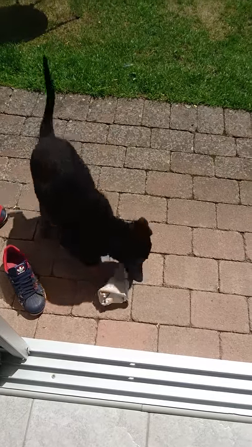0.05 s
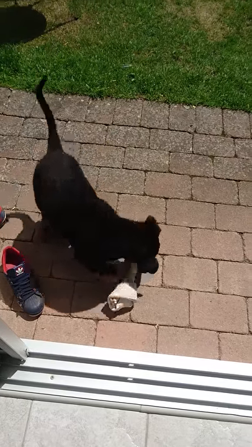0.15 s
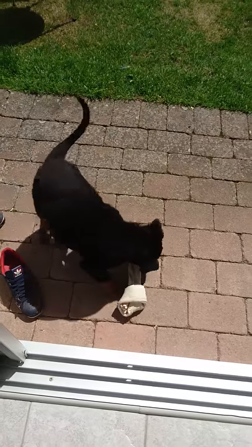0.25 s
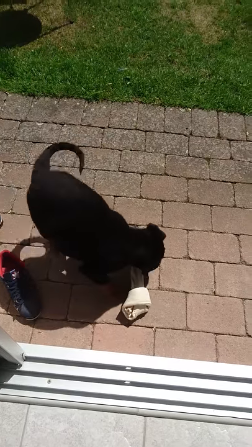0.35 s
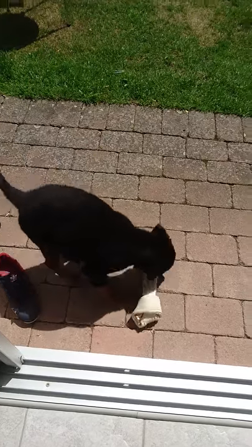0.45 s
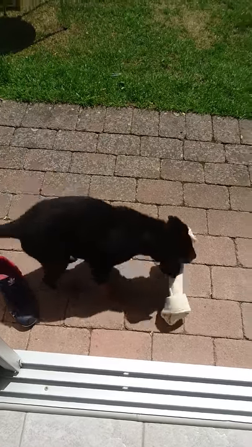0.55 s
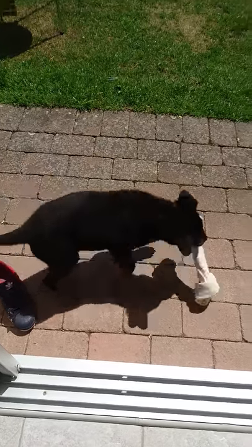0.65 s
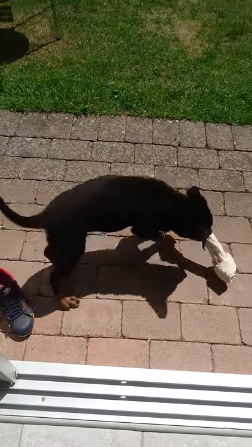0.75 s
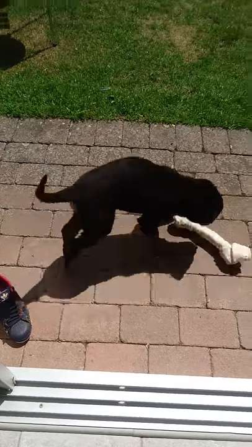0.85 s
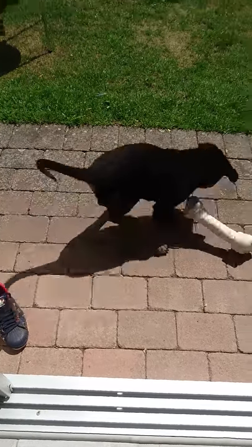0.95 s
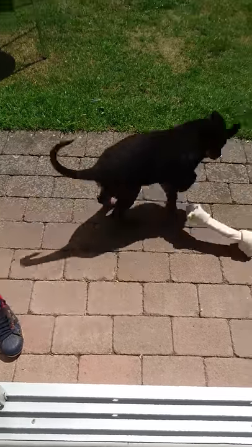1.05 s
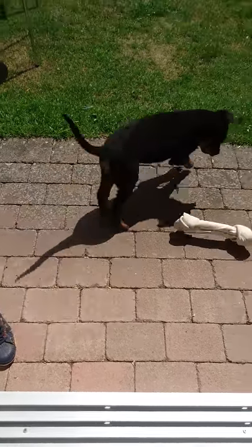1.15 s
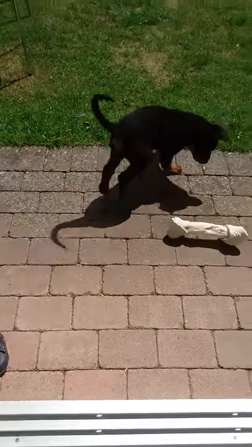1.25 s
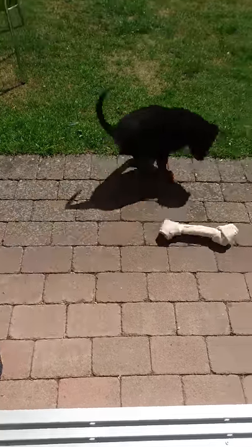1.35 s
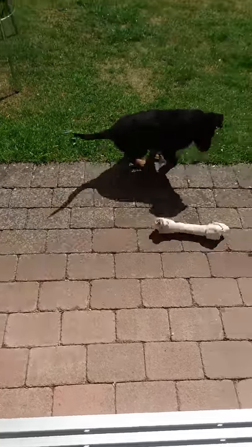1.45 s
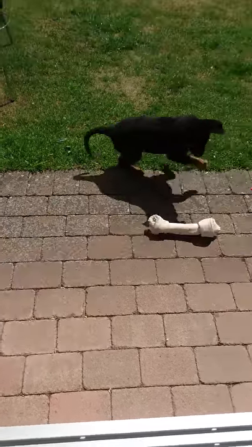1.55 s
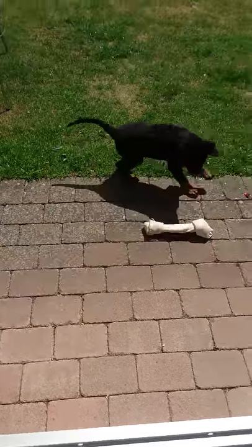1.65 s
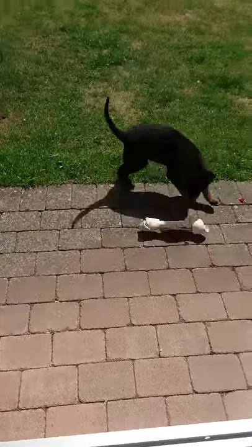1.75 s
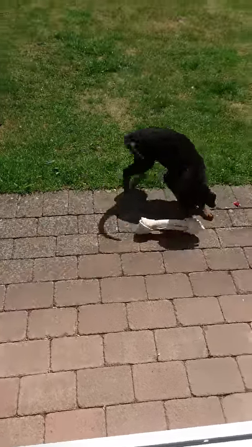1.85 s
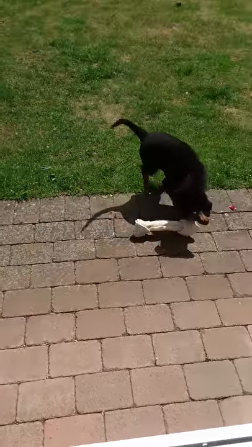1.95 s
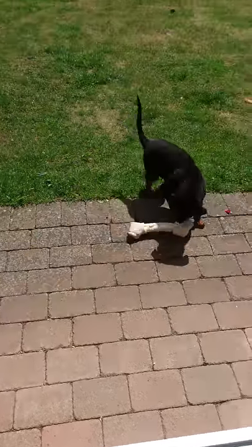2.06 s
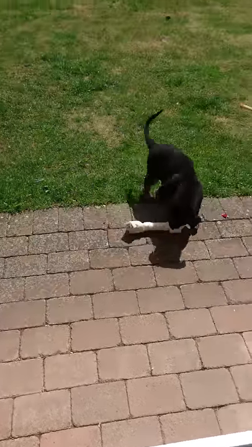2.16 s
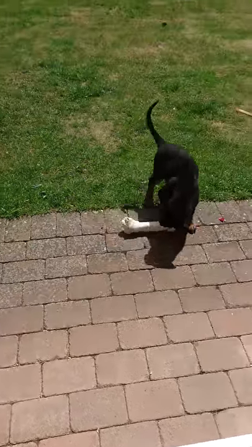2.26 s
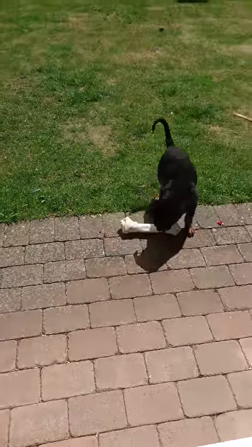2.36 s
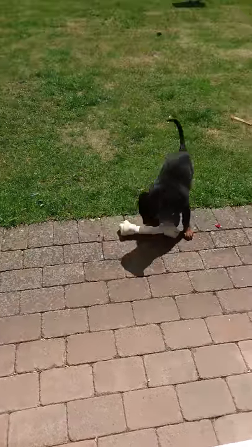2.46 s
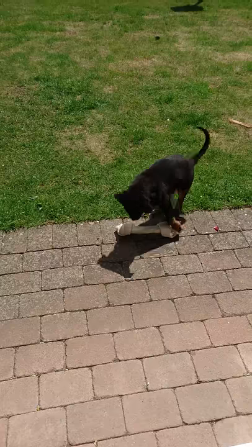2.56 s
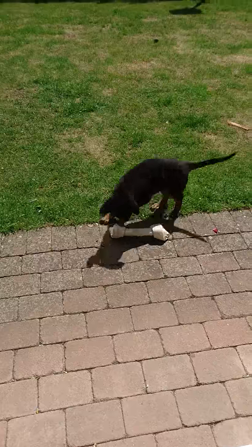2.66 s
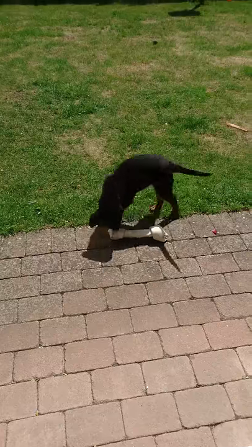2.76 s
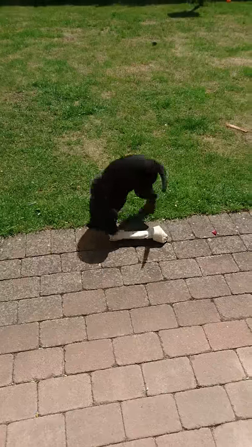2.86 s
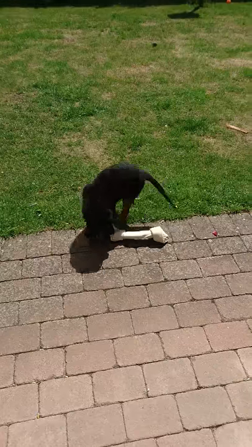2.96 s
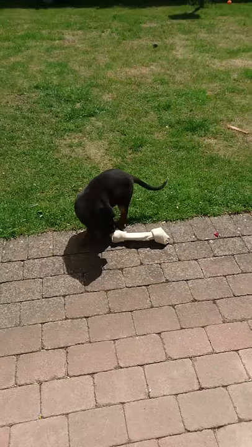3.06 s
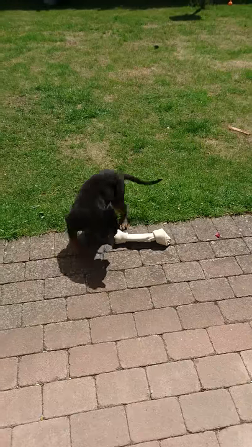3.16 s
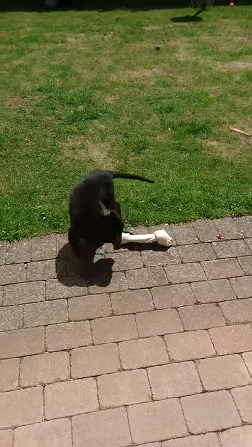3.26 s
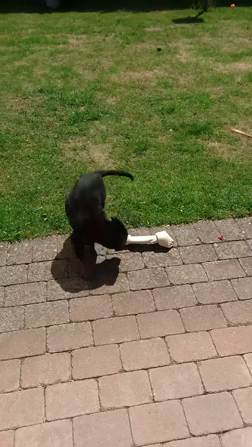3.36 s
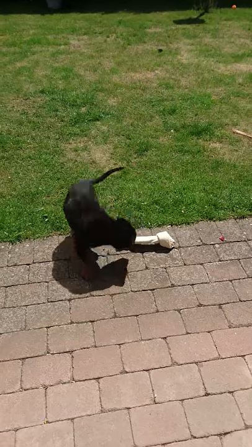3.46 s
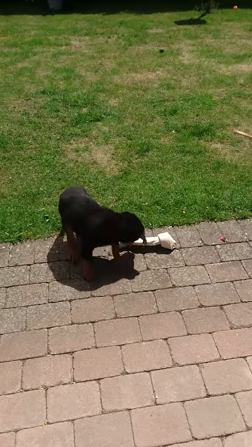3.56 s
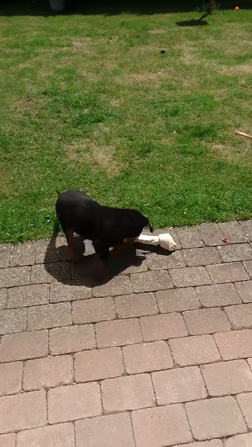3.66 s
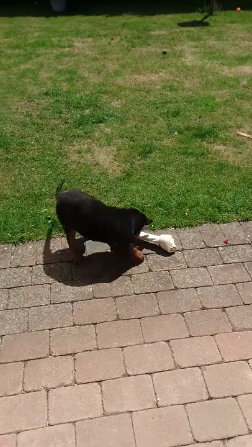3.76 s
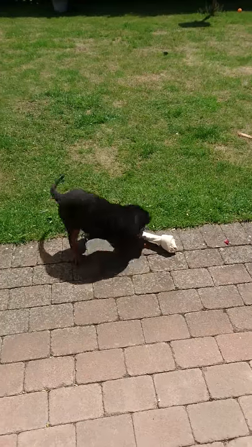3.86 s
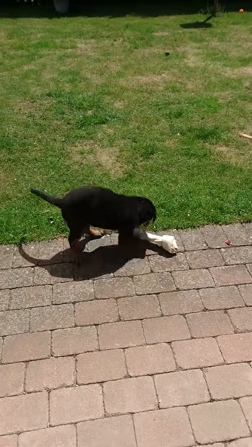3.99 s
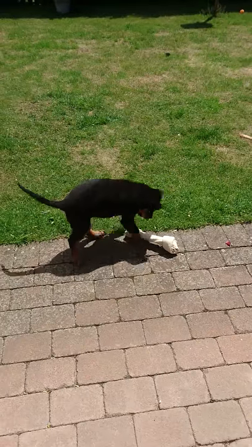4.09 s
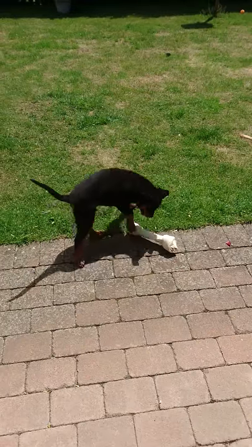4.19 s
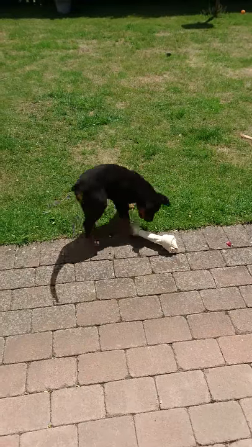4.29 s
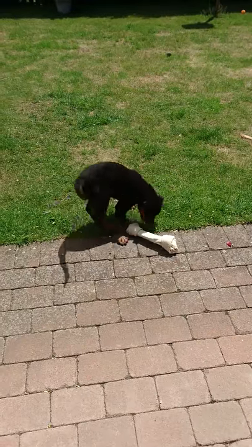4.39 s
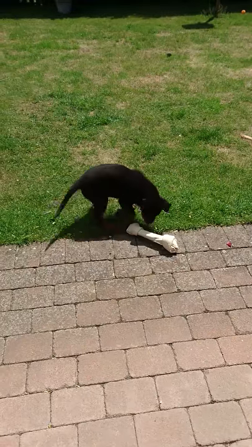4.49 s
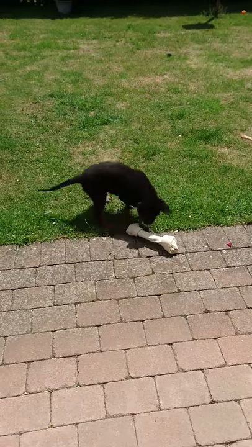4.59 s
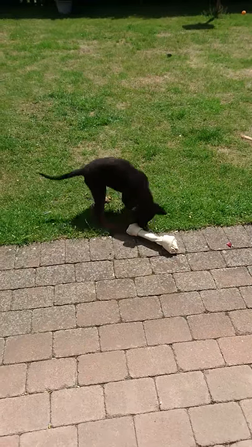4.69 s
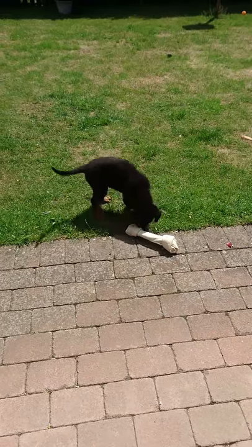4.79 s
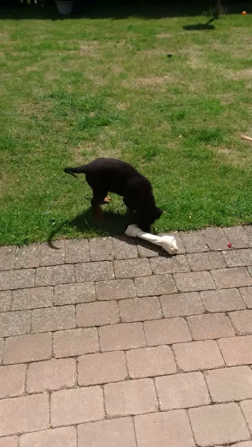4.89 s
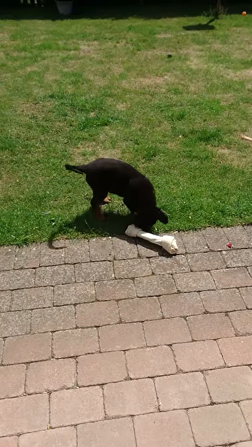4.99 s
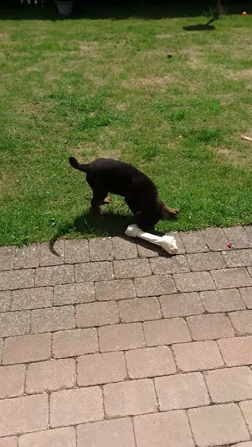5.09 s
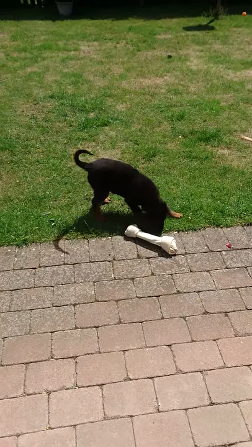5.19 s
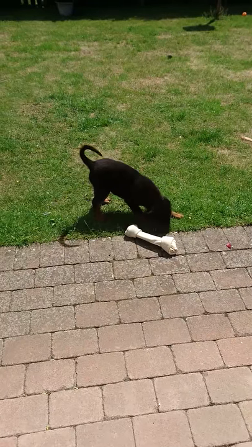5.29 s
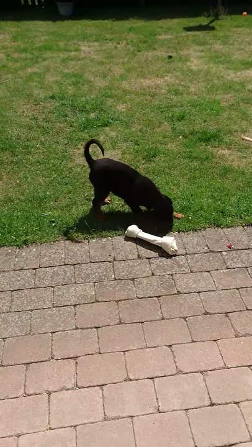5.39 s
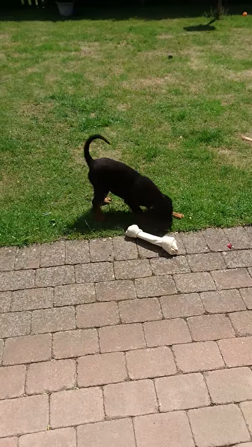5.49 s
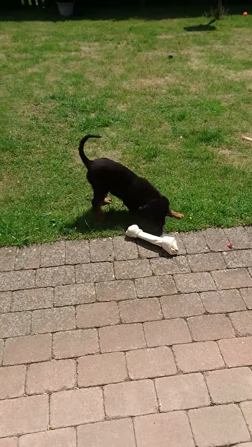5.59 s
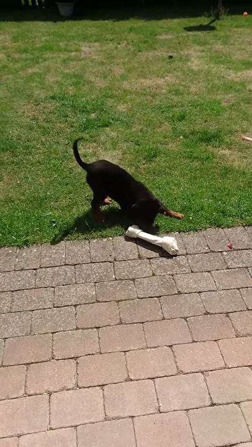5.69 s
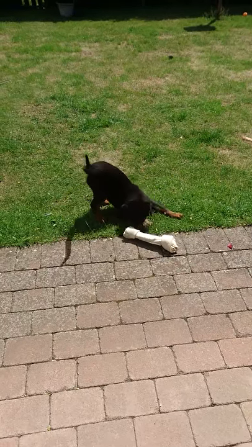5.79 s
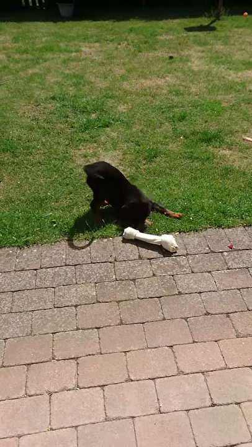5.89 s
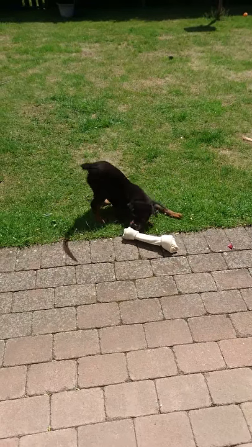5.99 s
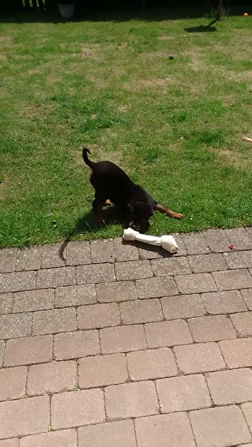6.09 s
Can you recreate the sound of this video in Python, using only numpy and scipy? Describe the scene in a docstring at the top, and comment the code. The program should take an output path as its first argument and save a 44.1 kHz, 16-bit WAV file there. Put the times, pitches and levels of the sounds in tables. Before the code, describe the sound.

Heard from just inside an open door, a chew bone scrapes on stone paving as a puppy growls briefly. A few loud, hollow knocks follow as the bone drops and bounces, each with a little room reverberation. Then the puppy paws around it with softer scrapes and claw taps, and sniffs quietly toward the end. Faint distant traffic, a low hum and microphone hiss lie underneath.

```python
"""Puppy with a rawhide bone

A puppy growls over a bone, drags it on paving stones, tosses it, and paws and sniffs round it.
Vocal pulses excite the throat's resonances; friction and impact excite the modes of the hollow bone.
Short wavering tones, like the bone ringing, and two low thumps sound among the knocks.
The microphones are just inside an open door, so the room behind them reverberates after every knock.
A low rumble and hum, far traffic and microphone hiss lie below."""
import sys
import numpy as np
from scipy import signal
from scipy.fft import rfft, irfft
from scipy.io import wavfile
from scipy.ndimage import uniform_filter1d

SR = 44100
rng = np.random.default_rng(int(sys.argv[2]) if len(sys.argv) > 2 else 0)


def output_pcm(signal):
    """Save a mono or channel-first signal as 16-bit PCM at the path in sys.argv[1].

    Samples are clipped to [-1, 1] before scaling.
    """
    pcm = np.clip(np.atleast_2d(signal).T, -1, 1) * 32767
    wavfile.write(sys.argv[1], SR, np.round(pcm).astype(np.int16))


N = 270631

# Course of the growl: t/s, f/Hz, level/dB
GROWL_CONTOUR = [(0, 122, -42), (.04, 156, -38), (.11, 156, -38), (.15, 143, -41.5), (.3, 141, -40),
                 (.36, 120, -42), (.395, 110, -47), (.42, 108, -58), (.47, 108, -110)]
# Modes of the throat, the bone, its hollow core and the paving slab: f/Hz, bandwidth/Hz, gain/dB
THROAT_MODES = [(155, 90, 0), (285, 90, -3), (430, 80, -12), (1000, 300, -24)]
BONE_MODES = [(708, 240, 1.5), (1034, 101, 7.5), (1296, 240, 1), (1742, 298, 2), (2000, 179, 4.5),
              (2255, 290, 1.5), (2800, 380, -1), (3220, 100, -3.5), (4050, 610, -8.5)]
CORE_MODES = [(289, 120, -2), (341, 69, 3), (413.6, 65, 5.5), (499, 31, -4.5)]
SLAB_MODES = [(146, 46, 7), (197, 32, -10), (266, 91, 7)]
# Scuffs of bone, claws and pads on stone: t/s at full level, rise/s, hold/s, decay/(dB/s),
# drag level/dB, core level/dB, grit level/dB, top-end level/dB, favoured f/Hz
SCUFFS = [(0.0, 0.014, 0.0031, 283, -53.5, -54.5, -57, -60, 2070),
          (0.065, 0.017, 0.0081, 168, -49.5, -45.5, -62.5, -62, 2100),
          (0.228, 0.018, 0.013, 89, -54, -53.5, -57.5, -61, 1040),
          (0.326, 0.26, 0.012, 153, -50.5, -49.5, -59, -62, 2530),
          (0.498, 0.05, 0.0067, 113, -52, -58.5, -60, -69, 2140),
          (0.557, 0.059, 0.011, 311, -46.5, -78, -50, -58, 2230),
          (0.688, 0.097, 0.014, 144, -58.5, -56, -66, -73, 1060),
          (0.825, 0.0078, 0.01, 165, -49, -54, -57, -63, 1940),
          (0.994, 0.009, 0.018, 114, -39, -48.5, -44.5, -57, 2057),
          (1.219, 0.25, .005, 500, -52.5, -58, -63, -69, 1330),
          (1.315, 0.021, 0.0044, 89, -42.5, -57, -64, -80, 1500),
          (1.486, 0.19, 0.026, 409, -50.5, -53.5, -58, -66.5, 3100),
          (1.625, 0.045, 0.0053, 178, -59, -58.5, -72, -78, 1900),
          (1.782, 0.038, 0.0046, 155, -56, -63.5, -65, -70, 1720),
          (2.214, 0.066, 0.0054, 217, -66.5, -56, -69.5, -81.5, 1350),
          (2.322, 0.02, 0.0046, 104, -62, -59.5, -65.5, -75, 1910),
          (2.476, 0.029, .005, 92, -62.5, -55.5, -70, -85, 1800),
          (2.641, .02, 0.016, 105, -67.5, -59.5, -72, -67, 1840),
          (2.702, 0.04, 0.0043, 130, -56, -53, -57, -63, 2700),
          (2.8, 0.26, .005, 93, -67.5, -64, -70, -71.5, 1820),
          (3.517, 0.098, .005, 108, -79.5, -71, -75.5, -84.5, 2090),
          (3.74, 0.0088, 0.012, 82, -60.5, -69, -62.5, -66, 1320),
          (3.79, 0.064, 0.0055, 147, -58, -55, -80, -74, 1300),
          (3.903, 0.11, 0.0074, 171.5, -64.5, -63, -81, -87, 1340),
          (3.975, 0.027, 0.0041, 330, -65.5, -61.5, -56.5, -67, 2040),
          (4.248, .015, 0.12, 129, -79, -66, -71, -77, 1480),
          (4.431, 0.051, .005, 181, -62.5, -70, -62, -67.5, 1420),
          (5.89, 0.018, 0.025, 130, -59.5, -59, -63.5, -68, 1600)]
# Spectra of grit, top-end noise, and far traffic with hiss: f/Hz, density level/dB
GRIT_SPECTRUM = [(1500, -34.5), (2800, -9), (3900, -5), (5100, -3.5), (6500, 0), (7500, -10.5), (8500, -33)]
TOP_SPECTRUM = [(6500, -27.5), (7600, -11.5), (9400, 3.5), (10600, -7.5), (13000, -20.5), (15800, -22)]
AMBIENT_SPECTRUM = [(18, -42), (30, -28), (48, -11), (106, -8.5), (130, -12.5), (203, -16), (238, -22.5),
                    (294, -13), (326, -18.5), (459, -22), (537, -24.5), (755, -27), (2390, -35),
                    (3830, -32), (15800, -38.5)]
# Low background: t/s, rumble level/dB, hum level/dB
RUMBLE_AND_HUM = [(0, -55.5, -52), (.3, -49.5, -65), (.48, -59.5, -71.5), (1, -54.5, -56.5),
                  (2.05, -64, -69), (2.4, -55.5, -66.5), (2.85, -56.5, -59.5), (3.02, -72.5, -83),
                  (3.35, -54, -66), (4.4, -56.5, -62.5), (4.93, -68, -68.5), (5.13, -60.5, -66.5),
                  (5.45, -68, -73), (6.14, -55.5, -75.5)]
# Impacts of bone and claws: t/s, level/dB, relative treble/dB, core/dB and slab/dB, contact time/ms
IMPACTS = [(0.065, -41.5, -27, -2, 7.5, 4.6), (0.175, -55.5, 17, 0, 0, 2.5),
           (0.592, -42, 10.5, -15, -13, 4.1), (0.825, -41, 9.5, -7, -2, 12), (0.845, -42, 8, -10, -5, 4),
           (0.982, -40, -15, 4, 8, 4), (0.9908, -20, 4, -6, -7, 3.5), (1.0, -28, -2, 4, -2, 4),
           (1.197, -46, -7, 3, -2, 9.9), (1.229, -38, -17, 4.5, -7, 5.8), (1.259, -20.5, -12, 2, -19, 2.5),
           (1.263, -22, -12, 3, -19, 2.5), (1.2675, -23.5, -10, 1, -19, 3),
           (1.3755, -28, -8, -12, -11.5, 3), (1.382, -32, -6, -10, -11, 3), (1.565, -63, 20.5, 2, 14, 7.1),
           (1.596, -39, -9, -2, -12, 3.5), (1.674, -46, -12, 8, -12, 5), (1.787, -48, 8, -14, 2, 1.4),
           (1.799, -36, -3.5, -1, -6.5, 2.7), (1.923, -62, 20, -2, 6, 1.5), (2.199, -59, -12, 2, 13.5, 3.6),
           (2.324, -52, -14, 8, 2, 2.7), (2.482, -47, -7, 7, 5, 5.8), (2.673, -54.5, 5, -8, 3.5, 13),
           (2.699, -54, 6, -6, -6, 3), (2.74, -55, 4, -6, -6, 3), (2.849, -54, 9, -6, -2.5, 5.9),
           (3.148, -68.5, 25, 3.5, 2.5, 6.6), (3.744, -55.5, -2, -2, 1, 7.5), (3.811, -51, -8, 10, -7, 4),
           (3.874, -67, 23, 0, 11, 6.5), (3.965, -66, 20, -5, -5, 2), (3.975, -53, 14, 0, -1, 3.4),
           (4.249, -65, 2, 12, 4, 8), (4.422, -55, 9, 15, 9.5, 5.4), (5.874, -62, -3, 10, 2, 6),
           (5.887, -56, 0, 4, 0, 10)]
# Wavering tones near 400 Hz, like the hollow bone ringing, and two low thumps near 140 Hz;
# then the squeak of a claw on stone: t/s, duration/s, level/dB, first f/Hz, last f/Hz
LOW_TONE_GLIDES = [(.655, .04, -51, 430, 450), (.695, .04, -43.5, 425, 445), (.745, .065, -52, 405, 400),
                   (.95, .045, -43, 125, 160), (1.005, .045, -43, 180, 130), (3.785, .045, -47.5, 415, 405)]
CLAW_SQUEAK = (2.613, .03, -66, 8900, 8600)
# Sniffs: t/s, duration/s, level/dB, nostril resonance f/Hz, relative top end/dB
SNIFF_PUFFS = [(3.026, 0.096, -61, 4960, 1.5), (4.598, 0.087, -71, 4000, -2), (5.294, 0.14, -73, 3500, -3),
               (5.66, 0.16, -68.5, 5530, -0.5)]
# Reverberation time of the room: f/Hz, T60/s
REVERB_TIME = [(100, 0.99), (500, 0.29), (2000, 0.31), (6000, 0.26), (14000, 0.21)]
# Left-right coherence of the background and of the reverberation: f/Hz, coherence
AMBIENT_COHERENCE = [(30, 0.061), (130, 0.8), (290, 0.4), (640, 0.32), (1400, 0), (16000, 0.058)]
ROOM_COHERENCE = [(100, 0.64), (300, 1), (600, 0.55), (1200, 0.36), (16000, 0.18)]
# Left microphone port relative to the right: f/Hz, level/dB; and f/Hz, phase lead/rad
PORT_LEVEL = [(60, 1), (130, -1), (250, -5), (450, -2.5), (1000, -3.5), (2000, -11), (4000, -4), (6500, -9),
              (9400, 7), (12000, 3)]
PORT_PHASE = [(60, 0.44), (150, 0.08), (280, 0.17), (430, 0.47), (1000, -0.24), (2000, 2), (3700, 0.23),
              (6000, 9.5), (8000, 7), (10600, 10), (16000, 15)]
# The microphones turn to follow the puppy: t/s, lag of the right port/ms
PORT_LAG = [(0, 0), (1.4, 0), (2.6, .32), (6.2, .32)]


def from_db(db):
    """Amplitude ratio of a level in decibels."""
    return 10 ** (np.asarray(db) / 20)


def unit_rms(x):
    """Normalisation to unit mean power."""
    return x / np.sqrt(np.mean(x ** 2) + 1e-20)


def in_time(rows):
    """Linear interpolation of each column to one value per sample."""
    times, *columns = np.transpose(rows)
    return [np.interp(np.arange(N) / SR, times, column) for column in columns]


def at_hz(points, hz):
    """Interpolation on a logarithmic frequency axis."""
    frequencies, values = np.transpose(points)
    return np.interp(np.log(hz + 1), np.log(frequencies), values)


def coloured(x, spectrum):
    """Filtering as multiplication of spectra."""
    return irfft(rfft(x) * from_db(at_hz(spectrum, np.fft.rfftfreq(N, 1 / SR))), N)


def drift(rate_hz):
    """Slow random modulation: low-passed noise of unit rms."""
    r = np.exp(-80 * np.pi * rate_hz / SR)
    slow = signal.lfilter([1], [1, -2 * r, r * r], rng.standard_normal(N // 40 + 2002))[2000:]
    return np.interp(np.arange(N) / 40, np.arange(len(slow)), unit_rms(slow))


def resonate(x, hz, width):
    """A damped resonator of unit peak gain."""
    r = np.exp(-np.pi * width / SR)
    poles = [1, -2 * r * np.cos(2 * np.pi * hz / SR), r * r]
    return signal.lfilter([(1 - r * r) / 2, 0, (r * r - 1) / 2], poles, x + 1e-18)


def body(x, modes):
    """Superposition of modes with alternating signs."""
    return sum((-1) ** k * from_db(db) * resonate(x, hz, width) for k, (hz, width, db) in enumerate(modes))


def grains(per_s, spread_db):
    """Shot noise: random impulses of uneven size, at unit rms."""
    sizes = from_db(spread_db * np.minimum(rng.exponential(1, N), 5)) * rng.choice([-1, 1], N)
    return unit_rms(sizes * (rng.random(N) < per_s / SR))


def stereo(mid, side, coherence):
    """Partial coherence: a weighted sum and difference of two independent noises."""
    return np.sqrt(1 + coherence) * mid + np.sqrt(1 - coherence) * side * [[1], [-1]]


def growl(jitter=.11, shimmer_db=4.5):
    """Source and filter: irregular vocal pulses excite the throat behind a nearly shut mouth."""
    pitch_hz, level_db = in_time(GROWL_CONTOUR)
    cycle = np.ceil(np.cumsum(pitch_hz * (1 + jitter * drift(50))) / SR).astype(int)
    strength = from_db(shimmer_db * rng.standard_normal(N // 40))[cycle]
    voice = body(np.diff(cycle, prepend=0) * strength, THROAT_MODES)
    voice = signal.sosfilt(signal.butter(2, 700, fs=SR, output="sos"), voice)   # soft folds, dull pulses
    running_rms = np.sqrt(uniform_filter1d(voice ** 2, size=900) + 1e-12)
    return from_db(level_db) * voice / running_rms   # effort alone sets the loudness


def scuff_envelope(levels_db, rise_db=30):
    """Incoherent addition: each scuff swells, holds and decays, and their powers sum."""
    t = np.arange(0, N + 32, 32) / SR
    full_at, rise, hold, decay = np.array(SCUFFS)[:, :4].T[:, :, None]
    swell_db = rise_db * np.minimum(t - full_at, 0) / rise
    fade_db = decay * np.maximum(t - full_at - hold, 0)
    power = from_db(2 * levels_db) @ from_db(2 * (swell_db - fade_db))
    return np.interp(np.arange(N) / SR, t, np.sqrt(power))


def rubbing(favour_db=6.5, wander_db=2.2):
    """Frictional excitation: stone grains pluck the bone; the contact point favours modes near one pitch."""
    drag_db, core_db, spot_hz = np.array(SCUFFS)[:, [4, 5, 8]].T
    plucks = from_db(3.6 * drift(45)) * grains(3000, spread_db=3)
    plucks /= np.std(body(plucks, BONE_MODES))
    drag = 0
    for k, (hz, width, db) in enumerate(BONE_MODES):
        nearness = np.exp(-(5 * np.log2(spot_hz / hz)) ** 2)
        force = plucks * scuff_envelope(drag_db + db + favour_db * nearness)
        drag += (-1) ** k * resonate(force * from_db(wander_db * drift(12)), hz, width)
    boom = unit_rms(body(grains(2000, spread_db=-.5), CORE_MODES))
    return drag + scuff_envelope(core_db) * boom


def brushing():
    """Roughness noise: dense, fine contacts give a bright, patchy hiss."""
    grit_db, top_db = np.array(SCUFFS)[:, [6, 7]].T
    sand = from_db(2.5 * drift(35)) * grains(3000, spread_db=3.8)
    grit = scuff_envelope(grit_db) * unit_rms(coloured(sand, GRIT_SPECTRUM))
    return grit + scuff_envelope(top_db) * unit_rms(coloured(sand, TOP_SPECTRUM))


def background(ambient_db=-64, rumble_hz=61.2, hum_hz=103):
    """Broadband noise of far traffic and hiss, with two narrow noise bands for rumble and hum."""
    mid, side = rfft(rng.standard_normal((2, N)))
    hz = np.fft.rfftfreq(N, 1 / SR)
    pair = stereo(mid, side, at_hz(AMBIENT_COHERENCE, hz))
    ambient = unit_rms(irfft(pair * from_db(at_hz(AMBIENT_SPECTRUM, hz)), N))
    rumble_db, hum_db = in_time(RUMBLE_AND_HUM)
    white = rng.standard_normal((2, N))
    rumble = unit_rms(resonate(resonate(white[0], rumble_hz, 14), rumble_hz, 14))
    rumble /= np.sqrt(uniform_filter1d(rumble ** 2, size=8000))   # lumpy, but without long swells
    hum = unit_rms(resonate(resonate(white[1], hum_hz, 31), hum_hz, 31))
    return from_db(ambient_db) * ambient + ports(from_db(rumble_db) * rumble + from_db(hum_db) * hum)


def knocks(scatter_db=2.5, broadening=1.99):
    """Impact excitation: a sharp hit and a dying chatter drive each mode with a random strength."""
    t = np.arange(int(.05 * SR)) / SR
    modes = BONE_MODES + CORE_MODES + SLAB_MODES
    drive, crack = np.zeros((len(modes), N + len(t))), np.zeros(N + len(t))
    for start, db, treble_db, core_db, slab_db, contact_ms in IMPACTS:
        noise, contact_s = rng.standard_normal(len(t)), contact_ms / 1000
        chatter = noise * np.abs(noise) * np.exp(-t / contact_s)
        chatter *= np.sqrt(.375 * SR * contact_s / np.sum(chatter ** 2))   # energy follows contact time
        chatter[0] = 3.3   # the sharp hit
        at = slice(round(start * SR), round(start * SR) + len(t))
        part_db = np.repeat([0, core_db, slab_db], [len(BONE_MODES), len(CORE_MODES), len(SLAB_MODES)])
        mode_db = db + 9 + part_db + scatter_db * rng.standard_normal(len(modes))
        drive[:, at] += from_db(mode_db)[:, None] * chatter
        crack[at] += from_db(db + treble_db) * chatter
    ringing = sum((-1) ** k * from_db(db) * resonate(drive[k, :N], hz, broadening * width)
                  for k, (hz, width, db) in enumerate(modes))
    return ringing + coloured(crack[:N], GRIT_SPECTRUM) + from_db(-1) * coloured(crack[:N], TOP_SPECTRUM)


def glide(start, length, db, from_hz, to_hz, waver_hz):
    """A short tone as a linear frequency sweep with random amplitude modulation."""
    progress = (np.arange(N) / SR - start) / length
    phase = 2 * np.pi * np.cumsum(from_hz + (to_hz - from_hz) * np.clip(progress, 0, 1)) / SR
    envelope = np.interp(progress, [0, .25, .6, 1], [0, 1, 1, 0])
    return from_db(db + 3 * drift(waver_hz)) * envelope * np.sin(phase)


def sniffing(width_hz=3200):
    """Flow noise: short puffs of air shaped by a broad nostril resonance."""
    puffs, white = np.zeros(N), rng.standard_normal(N)
    top = unit_rms(coloured(white, TOP_SPECTRUM))
    for start, length, db, hz, top_db in SNIFF_PUFFS:
        at = slice(round(start * SR), round((start + length) * SR))
        nose = unit_rms(resonate(resonate(white[at], hz, width_hz), hz, 2 * width_hz))
        puffs[at] += from_db(db) * np.sqrt(np.hanning(len(nose))) * (nose + from_db(top_db) * top[at])
    return puffs


def room(x, wet_db=-4.5, onset_s=.0012):
    """Reverberation: a diffuse field decays exponentially in each half-octave band."""
    t = np.arange(int(.7 * SR)) / SR
    edges, tail = 70 * 2 ** np.arange(0, 8.1, .5), 0
    for low, high in zip(edges, edges[1:]):
        band = signal.butter(2, [low, high], "band", fs=SR, output="sos")
        mid, side = signal.sosfilt(band, rng.standard_normal((2, len(t))))
        hz = np.sqrt(low * high)
        envelope = from_db(-60 * t / at_hz(REVERB_TIME, hz)) * (1 - np.exp(-t / onset_s))
        tail += envelope * stereo(mid, side, at_hz(ROOM_COHERENCE, hz))
    tail *= from_db(wet_db) / np.sqrt(np.sum(tail ** 2) / 2)
    return signal.fftconvolve(x[None], tail, axes=1)[:, :N]


def ports(pair):
    """Transfer functions of two microphone ports that differ in level and phase."""
    hz = np.fft.rfftfreq(N, 1 / SR)
    left = from_db(at_hz(PORT_LEVEL, hz) / 2) * np.exp(.5j * at_hz(PORT_PHASE, hz))
    return irfft(rfft(pair) * np.array([left, 1 / left]), N)


def scene():
    """Superposition of direct sound, reverberation and background."""
    low_sounds = growl() + sum(glide(*tone, waver_hz=30) for tone in LOW_TONE_GLIDES)
    clatter = rubbing() + brushing() + knocks() + sniffing() + glide(*CLAW_SQUEAK, waver_hz=250)
    near, n = low_sounds + clatter, np.arange(N)
    lag_samples = in_time(PORT_LAG)[0] * SR / 1000
    direct = np.array([near, np.interp(n - lag_samples, n, near)])
    return ports(direct + room(clatter + from_db(-12) * low_sounds)) + background()


def record(dry, low_hz=46, high_hz=15750, offset=-.001):
    """Band limiting at both ends, with a small DC offset from the converter."""
    dry = signal.sosfilt(signal.butter(3, low_hz, "high", fs=SR, output="sos"), dry) + offset
    return signal.sosfilt(signal.ellip(12, .5, 70, high_hz, fs=SR, output="sos"), dry)


dry = scene()
out = record(dry)
output_pcm(out)
```